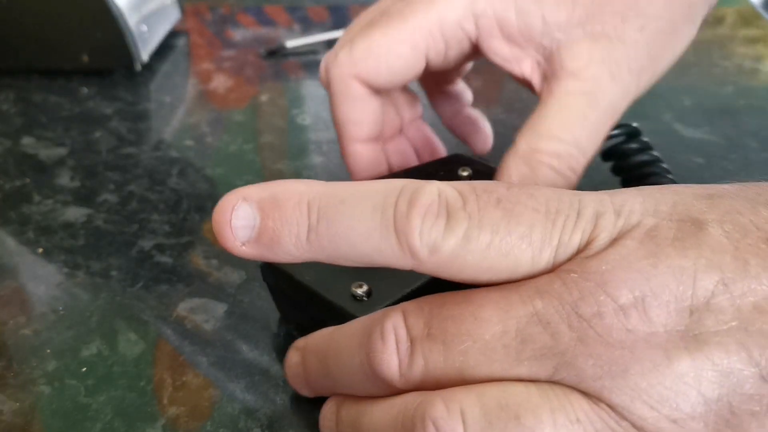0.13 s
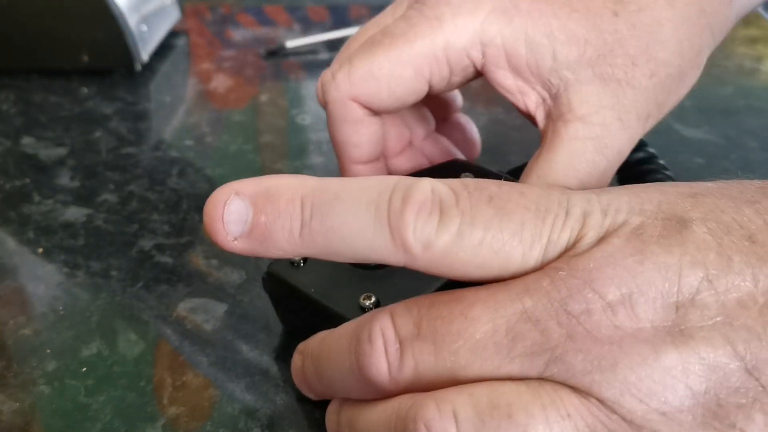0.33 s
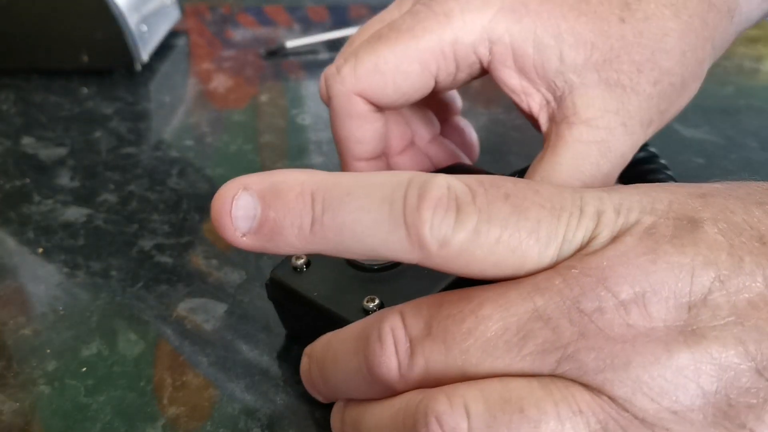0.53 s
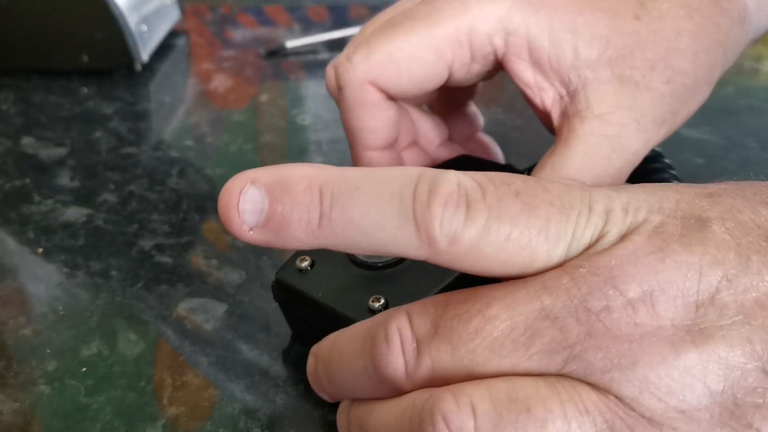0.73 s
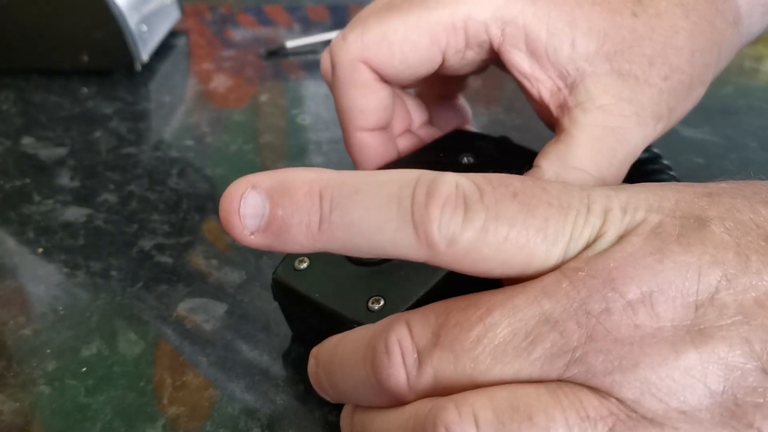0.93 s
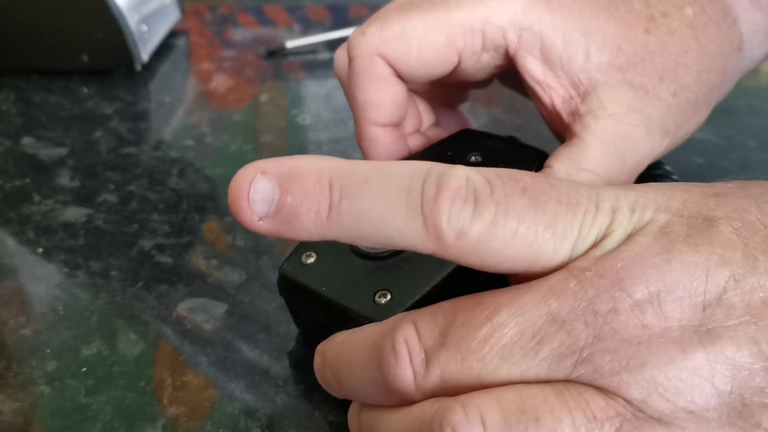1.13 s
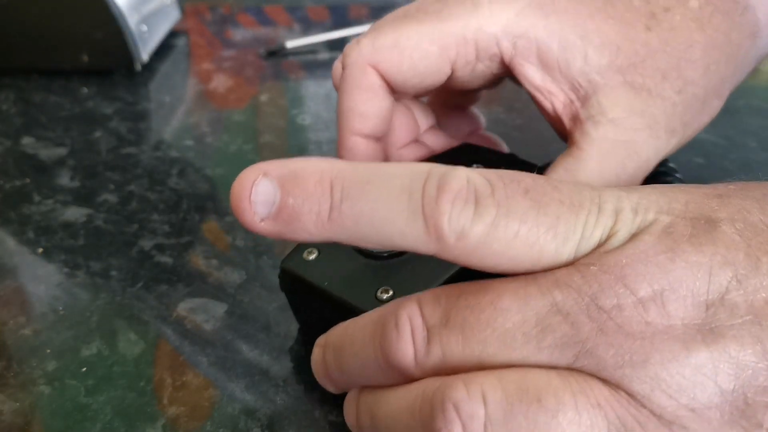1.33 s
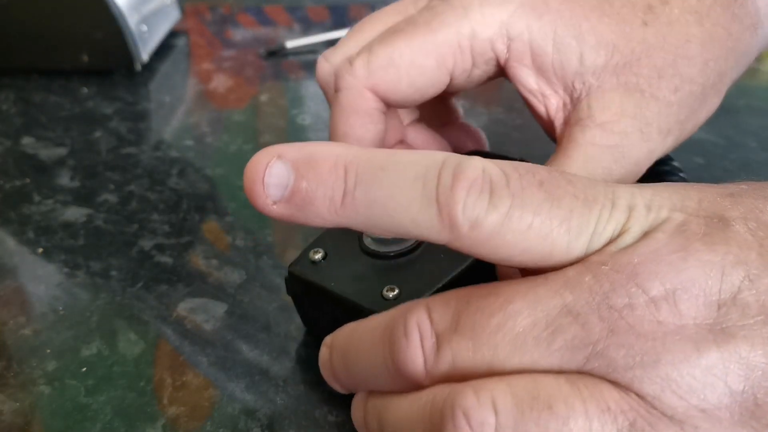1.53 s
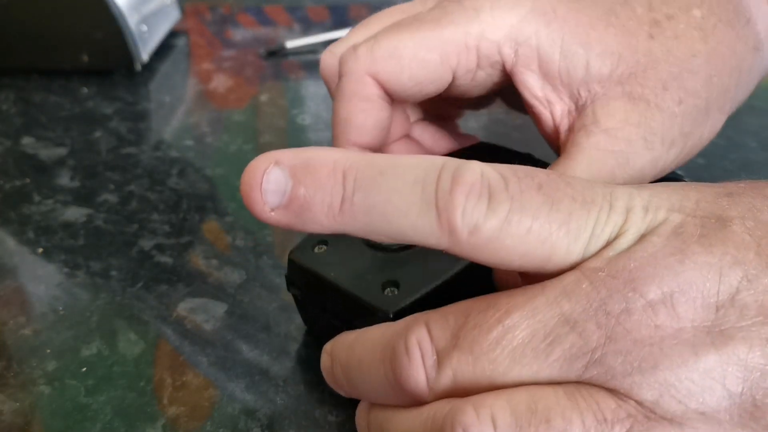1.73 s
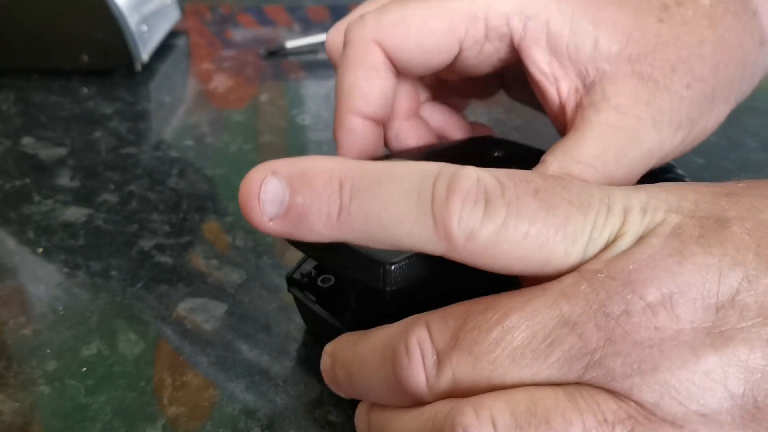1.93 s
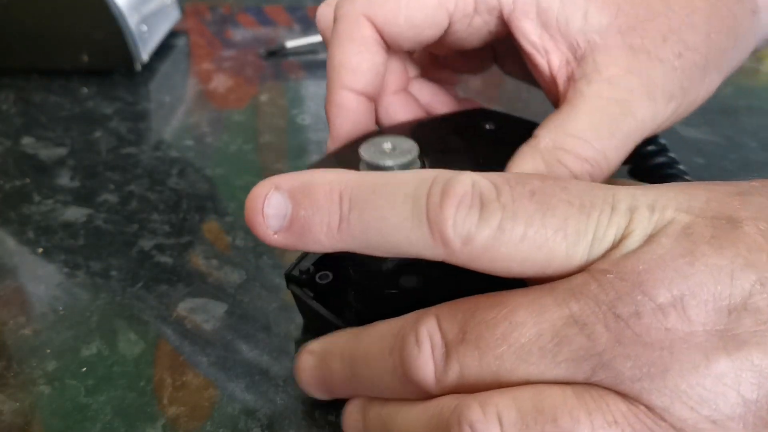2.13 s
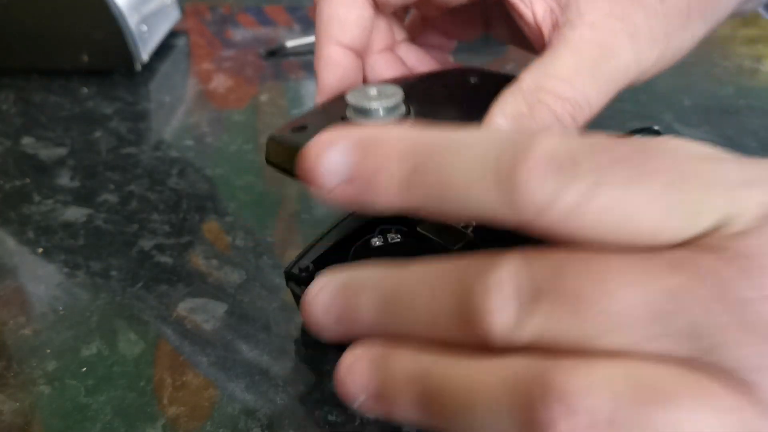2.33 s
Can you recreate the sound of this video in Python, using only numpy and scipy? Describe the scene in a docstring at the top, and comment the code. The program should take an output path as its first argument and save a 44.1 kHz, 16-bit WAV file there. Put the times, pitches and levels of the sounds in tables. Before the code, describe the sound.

Hard plastic case halves are pried apart by hand: soft rubbing first, then three bursts of sharp dry clicks with low handling rumble, ending nearly quiet; close stereo microphone in a small hard room.

```python
"""A table in a small hard room: hands pull apart the two halves of a hard plastic case, heard close in stereo.
Catches and edges click: each click is a blow plus decaying random slips, ringing the modes of the shell.
Filtered slips give the early rubbing and a late faint shuffle; low filtered noise gives the rumble of hands
and table. Noise tails, fading band by band, answer the clicks; filtered noise makes the quiet floor."""
import sys
import numpy as np
from scipy import signal
from scipy.fft import rfft, irfft
from scipy.io import wavfile
from scipy.ndimage import uniform_filter1d

SR = 44100
rng = np.random.default_rng(int(sys.argv[2]) if len(sys.argv) > 2 else 0)


def persist_wave(psi):
    """Save psi, clipped to +-1, as 16-bit WAV."""
    counts = np.round(np.clip(psi, -1, 1) * 32767).astype(np.int16)
    wavfile.write(sys.argv[1], SR, np.atleast_2d(counts).T)


def voltage_ratio(decibels):
    """Convert decibels (scalar or array-like) to amplitude ratios, 20 dB per decade."""
    exponent = np.asarray(decibels, float) / 20
    return 10 ** exponent


N = 110029
WAYS = np.array([[1], [-1]])  # sign of the side signal, left and right


def on_log(table, hz):
    """Read a (f/Hz, level/dB) table on a log-frequency axis."""
    table = np.array(table, float)
    return np.interp(np.log(np.maximum(hz, 1)), np.log(table[:, 0]), table[:, 1])


def unit(x):
    """Scale to rms 1."""
    return x / np.sqrt(np.mean(x ** 2))


def colour(x, *tables):
    """Filter a signal by the sum of some (f/Hz, level/dB) tables."""
    hz = np.arange(len(x) // 2 + 1) * SR / len(x)
    gain_db = sum(on_log(table, hz) for table in tables)
    return irfft(rfft(x) * voltage_ratio(gain_db), len(x))


def curve(rows):
    """Gain over time from (t/s, level/dB) rows, silent outside them."""
    rows = np.array(rows, float)
    t = np.arange(N) / SR
    return voltage_ratio(np.interp(t, rows[:, 0], rows[:, 1], left=-200, right=-200))


def grains(chance, per_s, spread_db):
    """Sparse impulses of uneven size and sign from two rows of uniform chance."""
    size = voltage_ratio(-spread_db * np.log(1 - chance[1]))
    struck = chance[0] < per_s / SR
    sign = np.sign(chance[0] * SR / per_s - .5)
    return size * struck * sign


# floor spectrum: [f/Hz, relative level/dB per Hz]
FLOOR_COLOUR = [(15, -31.5), (30, -19), (55, 6.5), (85, -8.5), (130, -4), (220, -3.5), (400, -21.5),
                (800, -13), (1600, -17), (3200, -22), (6500, -28.5), (8300, -34.5), (9500, -47),
                (14500, -49.5), (16000, -93)]
# floor width: [f/Hz, side minus mid/dB]
FLOOR_WIDTH = [(60, -4.5), (110, -7), (200, -7), (380, -8.5), (700, -6.5), (1290, -4.5), (2380, -4),
               (4400, 1), (8120, -2), (15000, 4)]
FLOOR_DB, FLOOR_WALK_DB, FLOOR_WALK_HZ = -67.5, .7, 3


def floor():
    """Quiet room tone: coloured noise whose level wanders slowly, wider in the treble than in the bass."""
    steps = np.repeat(rng.standard_normal(N // 100 + 1), 100)[:N]
    walk = uniform_filter1d(steps, int(SR / FLOOR_WALK_HZ))
    mid = colour(rng.standard_normal(N), FLOOR_COLOUR)
    side = colour(rng.standard_normal(N), FLOOR_COLOUR, FLOOR_WIDTH)
    scale = voltage_ratio(FLOOR_DB + FLOOR_WALK_DB * unit(walk)) / np.sqrt(np.mean(mid ** 2))
    return scale * (mid + side * WAYS)


# low rumble of hands and table: [t/s, level/dB]
RUMBLE_LEVEL = [(0, -68), (.35, -72), (.7, -77), (.76, -63.5), (1.07, -62), (1.2, -69), (1.39, -79),
                (1.48, -59.5), (1.7, -74), (1.87, -58), (2.1, -79.5), (2.135, -65), (2.23, -78),
                (2.5, -65.5)]
# rumble spectrum: [f/Hz, relative level/dB per Hz]
RUMBLE_TINT = [(15, -25), (30, -1), (55, -7), (120, -7.5), (200, -8.5), (350, 1), (550, -4.5), (900, -41.5)]
RUMBLE_SIDE_DB = -8.5


def rumble():
    """Low noise that swells while the hands work."""
    mid = unit(colour(rng.standard_normal(N), RUMBLE_TINT))
    side = unit(colour(rng.standard_normal(N), RUMBLE_TINT))
    return curve(RUMBLE_LEVEL) * (mid + voltage_ratio(RUMBLE_SIDE_DB) * side * WAYS)


# room tail by band: [f/Hz, level/dB, t60/s, side re mid/dB, L-R/dB]
ROOM_BANDS = [(245, -48, 0.41, -24, 27), (513, -1.5, 0.36, -8, 1), (1050, -0.5, 0.29, -16, -1.5),
              (2160, -4, 0.35, -4.5, 0), (3970, -10, 0.45, -0.5, -2), (5600, -5, 0.43, 0., -2),
              (7860, -9.5, 0.34, 1.5, 8.5), (12000, -7, 0.31, 1, -2)]
ROOM_GAP_MS, ROOM_BUILD_MS = 2.1, 1.33


def room(x):
    """Dense reflections of the left channel: noise that builds up fast and dies band by band."""
    t = np.arange(SR // 2) / SR
    build = 1 - np.exp(-np.maximum(t - ROOM_GAP_MS / 1000, 0) / (ROOM_BUILD_MS / 1000))
    hz = np.arange(len(t) // 2 + 1) * SR / len(t)
    centres = np.log([row[0] for row in ROOM_BANDS])
    noise = rfft(rng.standard_normal((2, len(t))))
    tail = 0
    for k, (_, db, t60, side_db, lr_db) in enumerate(ROOM_BANDS):
        band = np.interp(np.log(hz + 1), centres, np.arange(len(ROOM_BANDS)) == k)
        mid, side = irfft(noise * band, len(t))
        # normalised by decay energy
        fade = build * voltage_ratio(-60 * t / t60) / np.sqrt(t60 * SR / (2 * np.log(1000)))
        tail = tail + voltage_ratio(db + WAYS * lr_db / 2) * fade * (mid + voltage_ratio(side_db) * side * WAYS)
    return signal.fftconvolve(x[:1], tail, axes=1)[:, :N]


RISE_CYCLES = 0.56


def modes(table, gain, seconds):
    """Left and right ring of modes after one blow; each swells over about a cycle, then dies exponentially."""
    hz, db, t60, lr_db, lead = table.T[:, :, None]
    t = np.arange(int(seconds * SR)) / SR
    rise = (1 - np.exp(-t * hz / RISE_CYCLES)) ** 2
    fade = gain * voltage_ratio(db - 60 * t / np.maximum(t60, .002)) * rise
    ears = []
    for way in (1, -1):
        wave = np.sin(2 * np.pi * hz * t + way * lead / 2)
        ears.append((fade * voltage_ratio(way * lr_db / 2) * wave).sum(axis=0))
    return np.array(ears)


# main shell modes: [nominal f/Hz, relative level/dB, t60/s, L-R/dB, left lead/rad]
SHELL_MODES = [(192, -19.5, 0.065, -0.5, -0.5), (340, -10.5, 0.031, -0.5, -7), (592.6, 0.5, 0.01, 0, 0.),
               (1068, 1, 0.0096, -1.5, -1.5), (1650, 0, 0.0092, -2.5, 0.8), (2280, -4, 0.015, -2, 0.58),
               (2777, -2, 0.0093, 0.5, -.4), (3068, -0.5, 0.013, -1.5, 1.5), (3910, -4.5, 0.0072, -1, 0.4),
               (4880, -3, 0.017, -1.5, 2), (5437, -8.5, 0.04, 7.5, -1.5), (6100, -8.5, 0.017, -1.5, -1.5),
               (7270, -5.5, 0.0081, 5.5, 2), (7474, -9, .007, 7, 0.45)]
# early rubbing: [t/s, level/dB]
RUB_LEVEL = [(0, -57.5), (.08, -56), (.15, -55.5), (.25, -60), (.28, -63.5), (.35, -66.5), (.38, -70),
             (.43, -71), (.47, -79), (.52, -70), (.58, -82), (.7, -97)]
# faint shuffle as the lid comes free: [t/s, level/dB]
SHUFFLE_LEVEL = [(2.15, -81.5), (2.22, -73), (2.25, -67), (2.29, -92.5), (2.37, -84), (2.41, -74.5),
                 (2.5, -68.5)]
# rubbing filter: [f/Hz, relative gain/dB]
RUB_TINT = [(120, -30), (200, 1.5), (248, -10.5), (363, -1.5), (390, -19.5), (485, -4.5), (683, -1),
            (880, 0.5), (1850, -13), (2380, -0.5), (3670, -16.5), (5970, -10), (15000, -52)]
RUB_RING_DB, RUB_GRAIN_DB, RUB_GRAINS_PER_S, RUB_SIDE_DB = -19, 1, 9000, -3


def rubbing():
    """Dense small slips hiss and ring the shell while skin and table slide on it."""
    slips = grains(rng.random((2, N)), RUB_GRAINS_PER_S, RUB_GRAIN_DB)
    side = grains(rng.random((2, N)), RUB_GRAINS_PER_S, RUB_GRAIN_DB)
    impulse = modes(np.array(SHELL_MODES, float), 0.94, .05)
    rings = signal.fftconvolve(impulse, slips[None], axes=1)[:, :N]
    both = unit(slips) + voltage_ratio(RUB_SIDE_DB) * unit(side) * WAYS + voltage_ratio(RUB_RING_DB) * unit(rings)
    hiss = unit(np.array([colour(c, RUB_TINT) for c in both]))
    return hiss * (curve(RUB_LEVEL) + curve(SHUFFLE_LEVEL))


MINOR_COUNT, MINOR_LOW_HZ, MINOR_HIGH_HZ = 44, 500, 8300
MINOR_T60_S, MINOR_DB, GRIP_DETUNE = .007, 2.5, .015  # detune: largest fraction of f


def held_shell(chance):
    """Modes under one grip: main ones shifted a little, minor ones scattered between them."""
    main = np.array(SHELL_MODES, float)
    place = (np.arange(MINOR_COUNT) + chance[:MINOR_COUNT] / 2) / MINOR_COUNT
    hz = MINOR_LOW_HZ * (MINOR_HIGH_HZ / MINOR_LOW_HZ) ** place
    minor = np.array([hz] + [np.interp(hz, main[:, 0], col) for col in main.T[1:]]).T
    minor[:, 1] += MINOR_DB
    minor[:, 2] = MINOR_T60_S
    main[:, 0] *= 1 + GRIP_DETUNE * (2 * chance[-len(main):] - 1)
    return np.vstack([main, minor])


# catches and edges: [t/s, level before CLICK_DB/dB, tilt centre f/Hz, fall below it/dB per octave,
# fall above it/dB per octave, rattle decay/ms, contact tick re level/dB]; a negative fall is a rise
CLICK_EVENTS = [(0.271, -43.5, 1040, -2, 22, 0.73, -40), (0.297, -37, 1030, 1, 5.5, 4, -45),
                (0.345, -48, 1050, 6, 27, 3.2, -36), (0.424, -55, 1170, 12, 43, 0.5, -25),
                (0.506, -59, 1590, -6, 23, 1.8, -41), (0.715, -47, 716, 23, 11, 4.5, -40),
                (0.734, -22, 1180, -1.5, 8.5, 2, -38), (0.739, -34.5, 4750, 3.5, 3, 9, -24),
                (0.7488, -22.5, 2280.0, 45, 7, 2.1, -52), (0.758, -31.5, 2330, 8, 14, 3.2, -52),
                (0.767, -52, 2280.0, 6.0, 17, 2.2, -38), (0.781, -27.5, 2290, 7, 10, 3.1, -52),
                (0.889, -26.5, 2190, 9.0, 6, 1.9, -44), (0.945, -44, 2190, 0.5, 24, 2.2, -46),
                (0.981, -37, 2320, 1, 13.0, 4.5, -55), (1.01, -19, 2220, 8, 3, 2.5, -21.5),
                (1.03, -40, 2170.0, -2, 27, 2.4, -40), (1.128, -42, 1820, 2, 16, 0.53, -39),
                (1.268, -86, 1080, 7, 8, 1.5, -35), (1.334, -47, 1650, 9.5, 8.5, 0.81, -46),
                (1.433, -18.5, 3460, 7, 12, 1.9, -44), (1.443, -31.0, 3140, 6, 28, 10, -32),
                (1.454, -24.0, 3250, 3.5, 26, 3, -53), (1.467, -24.5, 3220, 2.5, 22, 2.8, -53),
                (1.475, -29.5, 2790, 26, 11.5, 8.7, -52), (1.5181, -22.5, 1630, -2, 0, 2.7, -41),
                (1.537, -17.5, 3010, 7.5, 5.5, 3, -30.5), (1.791, -39.5, 1440, 6.5, 7.0, 2.9, -53),
                (1.81, -32.5, 3050, 7.5, 17, 9, -62), (1.82, -34, 3170, 0, 18, 3.6, -54),
                (1.8242, -20.0, 3240, 0.5, 5, 2.56, -47), (1.862, -21, 3330, 5, 3, 3.3, -39),
                (1.866, -18, 2280, 2, 1.5, 1.4, -39), (1.868, -18.5, 2170, 35, 4.5, 2.8, -36),
                (1.89, -42.5, 2280.0, -6, 7, 0.73, -47), (2.125, -40.5, 1690, 8.5, 11.5, 11, -54),
                (2.251, -54, 1120, -0.5, -1, 2.3, -35), (2.401, -57.0, 1040, -1, -3.5, 0.78, -22)]
# contact tick spectrum: [f/Hz, relative gain/dB]
TICK_TINT = [(7000, -19), (8500, 4.5), (11000, 0), (14800, -15), (15400, -28), (17000, -52)]
CLICK_DB, BLOW_SCATTER_DB = -1, 1.5
RATTLE_DB, RATTLE_PER_S, SLIP_SPREAD_DB = -11, 6000, 1.5
BOOST_DB, BOOST_OCTAVES = 4, .12  # small boost at the tilt centre
RING_LOWPASS_HZ, TICK_MS = 9070, 3.8  # steep lowpass on the ring; tick noise is added after it


def clicks():
    """One blow and a fading rattle of slips; mode levels tilt either side of a centre, with a small boost there."""
    span = SR // 10
    age_ms = np.arange(span) / SR * 1000
    out = np.zeros((2, N + 2 * span))
    lowpass = signal.butter(10, RING_LOWPASS_HZ, fs=SR, output="sos")
    chances = rng.random(size=(len(CLICK_EVENTS), 4, span))
    hiss = rng.standard_normal((len(CLICK_EVENTS), 2, span))
    for event, chance, noise in zip(CLICK_EVENTS, chances, hiss):
        s, db, centre_hz, below_db, above_db, ms, tick_db = event
        slips = grains(chance, RATTLE_PER_S, SLIP_SPREAD_DB)
        rattle = voltage_ratio(RATTLE_DB) * slips * np.exp(-age_ms / max(ms, .2))
        rattle[0] = 1  # the blow
        shell = held_shell(chance[2])
        off = np.log2(shell[:, :1] / centre_hz)  # octaves from the tilt centre
        scatter = 2 * chance[3, :len(off), None] - 1
        sign = (-1) ** np.arange(len(off))[:, None]
        tilt_db = np.where(off < 0, below_db * off, -above_db * off)
        boost_db = BOOST_DB * np.exp(-(off / BOOST_OCTAVES) ** 2)
        gain = sign * voltage_ratio(tilt_db + BLOW_SCATTER_DB * scatter + boost_db)
        ring = signal.fftconvolve(modes(shell, gain, span / SR), rattle[None], axes=1)
        click = signal.sosfilt(lowpass, ring)
        click *= voltage_ratio(CLICK_DB) / np.abs(click.mean(axis=0)).max()
        tick = unit(np.array([colour(c, TICK_TINT) for c in noise])) * np.exp(-age_ms / TICK_MS)
        click[:, :span] += voltage_ratio(tick_db) * tick
        i = int(s * SR)
        out[:, i:i + click.shape[1]] += click * voltage_ratio(db)
    return out[:, :N]


def scene():
    """Floor, rumble and rubbing under the clicks and their room tail."""
    near = clicks()
    return floor() + rumble() + rubbing() + room(near) + near


def roll_off(x):
    """The treble ends steeply here."""
    return signal.sosfilt(signal.butter(12, 16370, fs=SR, output="sos"), x)


def record(dry):
    """Turn the finished mix into the output."""
    return roll_off(dry)


dry = scene()
out = record(dry)
persist_wave(out)
```